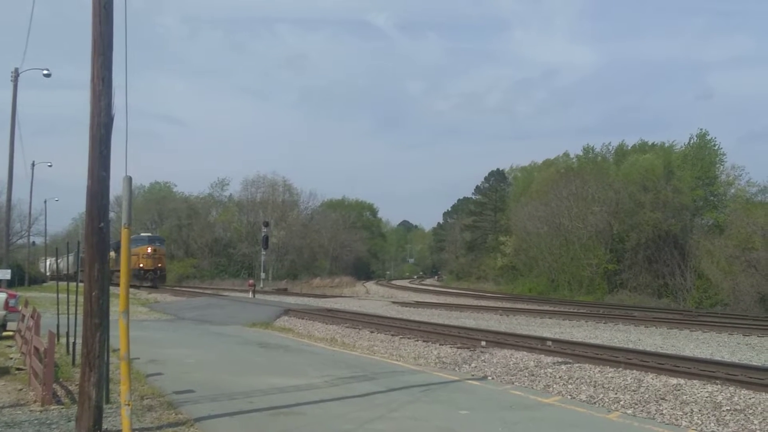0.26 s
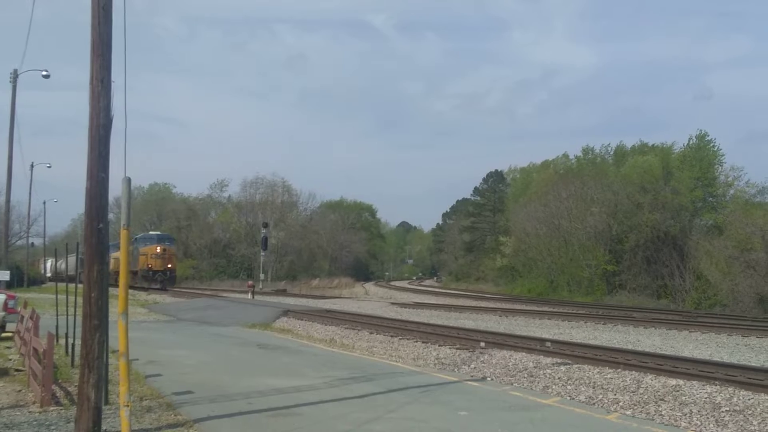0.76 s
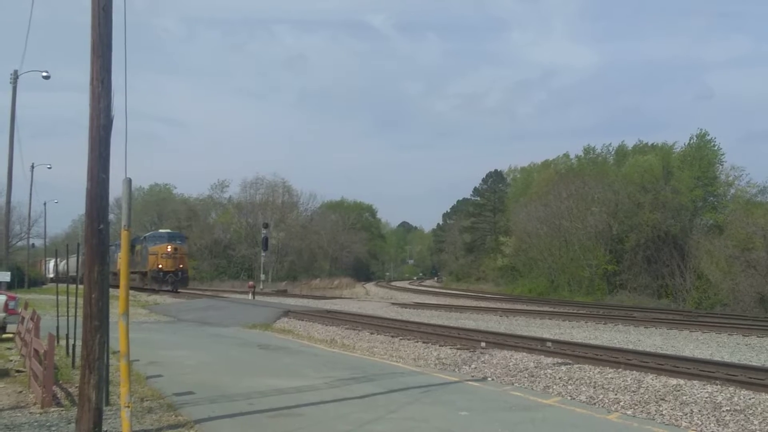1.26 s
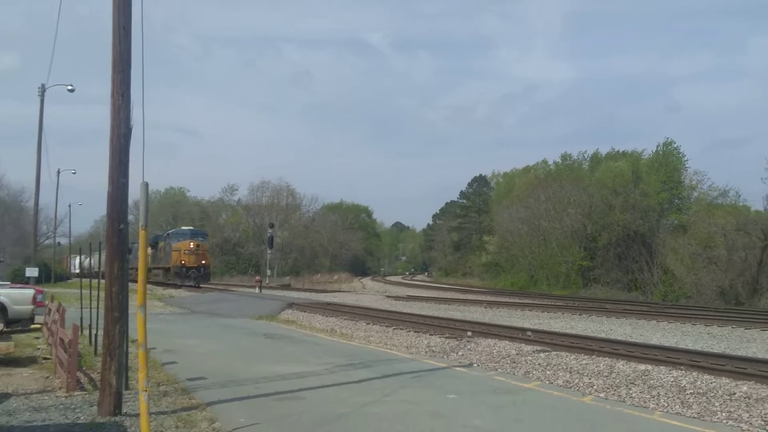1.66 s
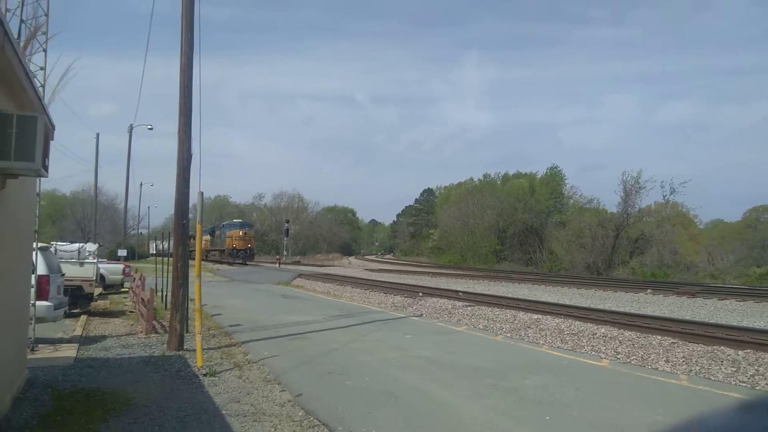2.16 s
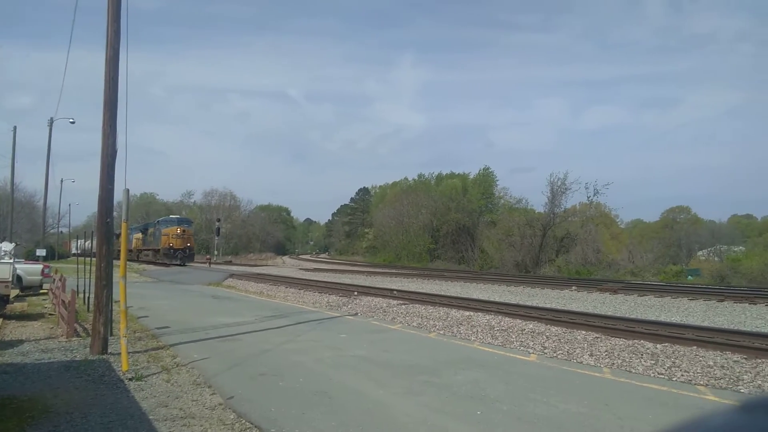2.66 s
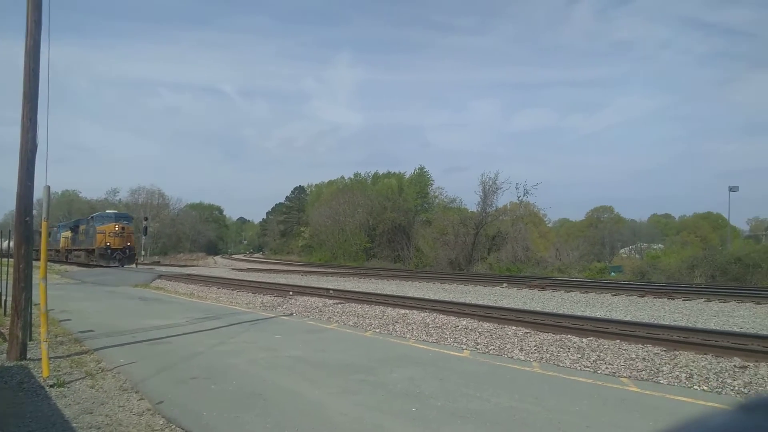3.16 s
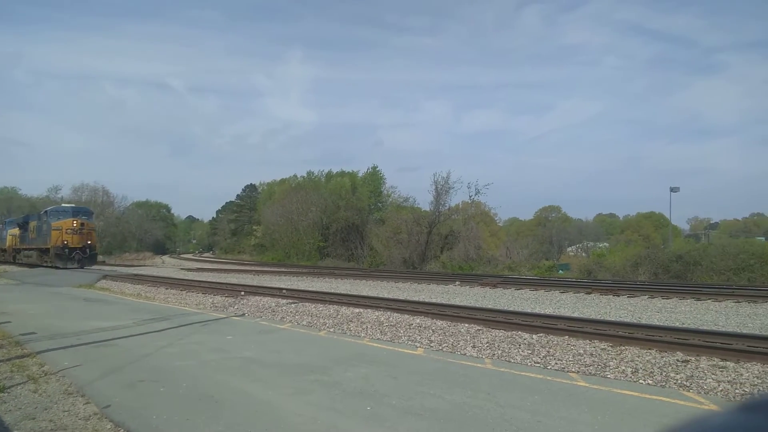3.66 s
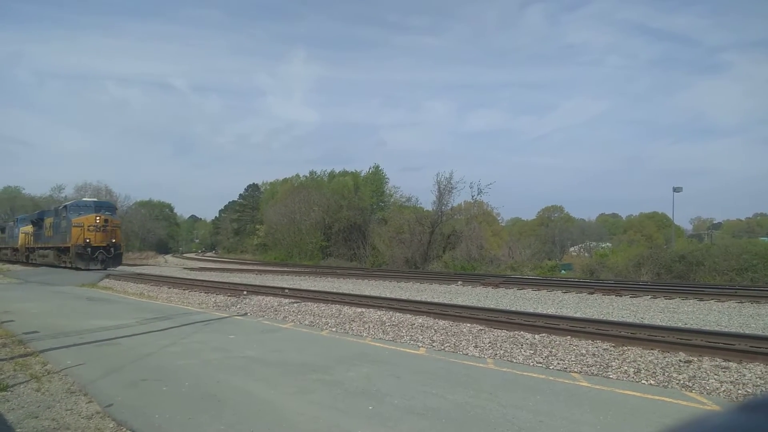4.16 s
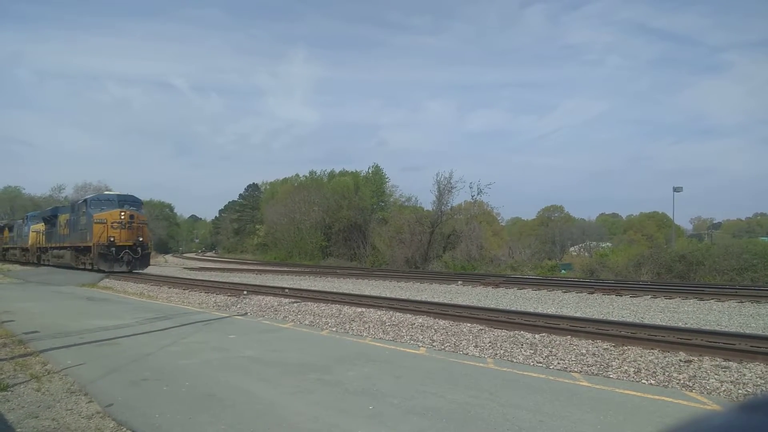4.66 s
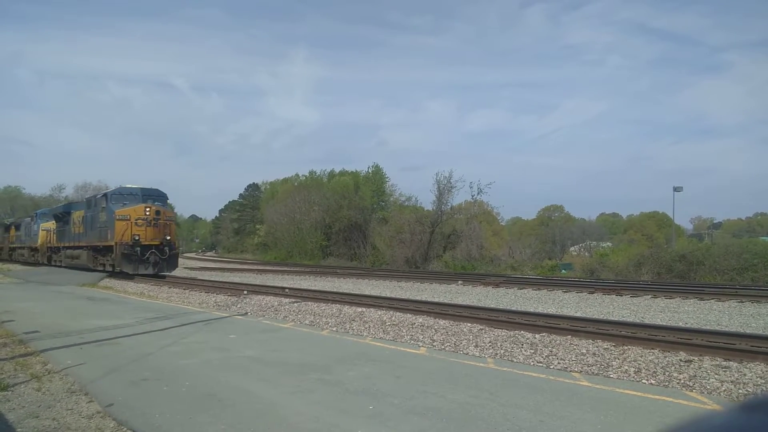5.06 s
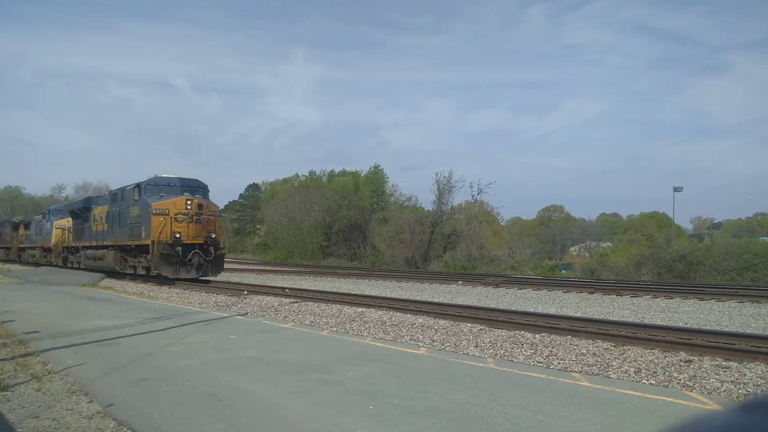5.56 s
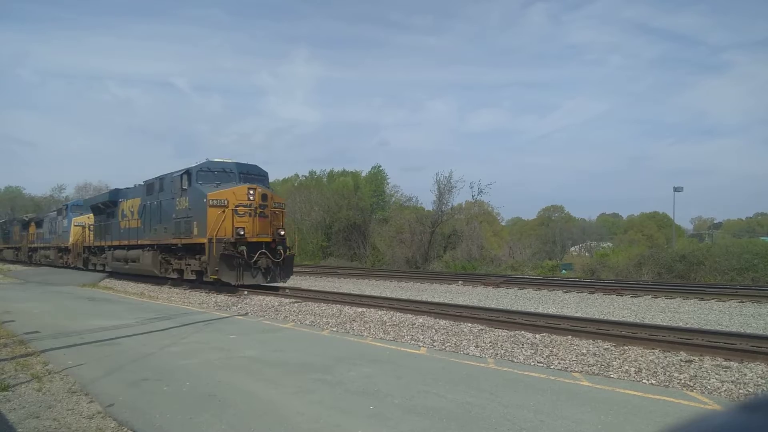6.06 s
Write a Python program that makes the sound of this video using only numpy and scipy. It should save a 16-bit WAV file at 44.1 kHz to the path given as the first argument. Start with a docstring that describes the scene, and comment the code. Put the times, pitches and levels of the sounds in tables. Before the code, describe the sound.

A diesel freight train approaches with a rumbling, humming engine and rolling wheels in light wind, its horn starting at the very end.

```python
"""A diesel freight train draws near over open ground and starts to blow its four-bell horn.
Cylinder firings make the exhaust rumble, two engines beat in a hum, fans rush and gears whine.
Wheels roar on the rails and clack over a switch, air valves spit, and faint chirps sound.
A light breeze buffets a phone's two microphone ports; its knocks and the horn push down the limiter."""
import sys
import numpy as np
from scipy import signal
from scipy.fft import rfft, irfft
from scipy.io import wavfile
from scipy.ndimage import uniform_filter1d, minimum_filter1d

SR = 44100
rng = np.random.default_rng(int(sys.argv[2]) if len(sys.argv) > 2 else 0)


def transcribe(u):
    """Save the signal u as a 16-bit wav file named by the first command-line argument.

    u: samples, shape (n,) or (channels, n), limited to [-1, 1]; the rate is SR.
    q: integer samples, one column per channel.
    """
    v = np.clip(np.atleast_2d(u).T, -1, 1)
    q = np.round(v * 32767).astype(np.int16)
    wavfile.write(sys.argv[1], SR, q)


N = 278712
T = np.arange(N) / SR
FREQ = np.maximum(np.arange(N // 2 + 1) * SR / N, 1)
CROSSING_SAMPLES = 2  # travel time of a wave from port to port


def undb(db):
    """Amplitude ratio of a level in decibels."""
    return 10 ** (np.asarray(db) / 20)


def unit(x):
    """Normalisation to rms 1."""
    return x / np.sqrt(np.mean(x ** 2))


def curves(table):
    """Linear interpolation of each column of a time table, one value per sample."""
    times, *columns = np.transpose(table)
    return [np.interp(T, times, column) for column in columns]


def bump(s, length_s):
    """Gaussian envelope of height 1, centred on time s."""
    return np.exp(-(2 * (T - s) / length_s) ** 2)


def pan(db):
    """Level difference, left minus right, as a pair of gains."""
    return undb(np.array([[db], [-db]]) / 2)


def colour(x, spectrum):
    """Spectral shaping by (f/Hz, level/dB) points with a roll-off beyond both ends, at rms 1."""
    hz, db = np.transpose(spectrum)
    roll_off = np.minimum(1, np.minimum(FREQ / hz[0], hz[-1] / FREQ)) ** 3
    gain = undb(np.interp(np.log(FREQ), np.log(hz), db))
    return unit(irfft(rfft(x) * roll_off * gain, N))


def resonate(x, hz, half_width_hz):
    """Resonance with steep skirts, 14 dB down at half_width_hz off centre, at rms 1."""
    return unit(irfft(rfft(x) / (1 + ((FREQ - hz) / half_width_hz) ** 2) ** 2.4, N))


def walk(rate_hz):
    """Random fluctuation: low-pass noise at rms 1."""
    return unit(irfft(rfft(rng.standard_normal(N)) * np.exp(-(FREQ / rate_hz) ** 2), N))


def air(own_db):
    """Partial coherence: one noise wave crosses both ports, and each adds noise of its own."""
    wave = rng.standard_normal(N)
    return np.array([wave, np.roll(wave, CROSSING_SAMPLES)]) + undb(own_db) * rng.standard_normal((2, N))


# bird-like chirps: t/s, duration/s, level/dB, f/Hz, glide/(Hz/s)
CHIRP_NOTES = [(0.183, 0.038, -47.5, 3070, 0), (0.523, .03, -46, 3970, 2002), (.551, .018, -47, 2850, 3000),
               (0.575, 0.022, -48, 3050, -19000), (.765, .02, -51, 2920, -12000),
               (0.939, 0.045, -54, 3010, -1000)]

def chirps(waver=0.0173):
    """Frequency modulation: faint, thin whistles glide and waver."""
    out = 0
    for s, length_s, db, hz, glide_hz_s in CHIRP_NOTES:
        pitch = (hz + glide_hz_s * np.clip(T - s, -length_s, length_s)) * (1 + waver * walk(250))
        out = out + undb(db) * bump(s, length_s) * np.sin(2 * np.pi * np.cumsum(pitch) / SR)
    return out


# gusts at the ports: t/s, duration/s, relative level/dB
WIND_GUSTS = [(0.09, .2, -33.5), (0.663, 0.14, -23), (1.42, 0.29, -19.5), (1.677, 0.3, -23),
              (2.067, 0.37, -18.5), (2.994, 0.18, -22.5), (3.302, 0.35, -29), (3.72, 0.53, -20),
              (3.98, 0.071, -26), (4.42, 0.14, -23), (4.7, 0.26, -27), (5.55, 0.14, -24.5)]
# spectrum of the breeze's rumble: f/Hz, relative level/dB
BREEZE_SPECTRUM = [(20, -38.5), (32, -32), (48, -7.5), (65, 8), (90, 0.5), (160, -11.5)]
# spectrum of the brighter eddies: f/Hz, relative level/dB
EDDY_SPECTRUM = [(50, -12.5), (80, -5), (120, 8.5), (180, -5.5), (260, -5.5), (400, -15), (900, -52)]

def wind(flicker_db=4.0, opposed=0.55, calm_rumble_db=-30.5, calm_eddy_db=-37.5):
    """Turbulence: rumble and eddies swell with each gust and push the ports in opposite senses."""
    gusts = sum(undb(db) * bump(s, length_s) for s, length_s, db in WIND_GUSTS)
    flow = np.array([rng.standard_normal(N) * undb(flicker_db * walk(21)) for _ in range(2)])
    flow = flow - opposed * flow[::-1]
    rumble = colour(flow, BREEZE_SPECTRUM) * np.hypot(undb(calm_rumble_db), gusts * undb(-13))
    eddies = colour(flow[::-1, ::-1], EDDY_SPECTRUM) * np.hypot(undb(calm_eddy_db), gusts * undb(-4.5))
    return rumble * pan(-4) + eddies * pan(1)


# knocks of wind on the ports: t/s, level/dB, f/Hz
WIND_KNOCKS = [(1.738, -9, 220), (1.7989, 2, 235), (2.086, -4.5, 204), (2.9633, -15, 230),
               (4.021, -3.5, 196), (4.498, -19, 210)]

def buffets(half_length_s=0.0018):
    """Pressure transients: a sharp eddy thumps for a cycle or two, out of phase between the ports."""
    port_phase = np.array([[0], [2.4]])
    out = np.zeros((2, N))
    for s, db, hz in WIND_KNOCKS:
        t = T - s
        out += undb(db) * np.exp(-(t / half_length_s) ** 2) * np.cos(2 * np.pi * hz * t + port_phase)
    return out * pan(5.1)


# blows of wheels on a switch: t/s, level/dB
SWITCH_BLOWS = [(2.958, -27), (2.989, -23.5), (3.022, -27), (4.490, -21.5), (4.524, -20.5), (4.564, -26)]
# modes rung by a blow: f/Hz, relative level/dB, decay time/s
SWITCH_MODES = [(620, -4, .004), (860, -2, .0035), (1240, -9, .003)]

def clacks():
    """Impact excitation: distant wheels strike a switch, whose damped modes ring for milliseconds."""
    blows = np.zeros(N)
    for s, db in SWITCH_BLOWS:
        blows[int(s * SR)] = undb(db)
    ring = sum(undb(db) * np.exp(-T / decay_s) * np.sin(2 * np.pi * hz * T)
               for hz, db, decay_s in SWITCH_MODES)
    return signal.fftconvolve(blows, ring)[:N]


# rolling noise as the cars round the bend: t/s, relative roar level/dB, relative hiss level/dB
ROLLING_LEVELS = [(0, -41, -52), (1.3, -41.5, -52.5), (2.1, -41.5, -50), (3.5, -42, -50), (4.3, -44.5, -53),
                  (5.1, -45, -53.5), (6.1, -41, -49.5)]
# spectrum of the wheels' roar: f/Hz, relative level/dB
ROAR_SPECTRUM = [(200, -17.5), (400, -13), (600, -3.5), (1050, -0.5), (1400, -8), (1800, -7), (2200, -6),
                 (2800, -13), (4500, -28)]
# spectrum of the rails' hiss: f/Hz, relative level/dB
HISS_SPECTRUM = [(1300, -19.5), (2200, 5), (2900, -16), (4000, 3.5), (4700, -5), (5500, -7), (6400, -13),
                 (7600, -9.5), (9500, -19.5), (12000, -32.5), (14500, -40.5)]

def wheels(swell_db, lean_db=5):
    """Rolling noise: wheels roar and rails hiss, brighter as less air lies between to absorb treble."""
    roar_db, hiss_db = curves(ROLLING_LEVELS)
    roar = colour(air(5), ROAR_SPECTRUM) * undb(roar_db + swell_db + 1.5 + 0.9 * walk(9.9)) * pan(1.5)
    brightness = undb(np.interp(T, [1.5, 6], [-22, -7]))
    sides = []
    for _ in range(2):
        body = colour(air(1), HISS_SPECTRUM)
        treble = resonate(air(0.94), 5600, 1400) + undb(-6) * resonate(air(0.9), 9000, 3500)
        sides.append((body + brightness * treble) * pan(lean_db))
    left, right = sides[0], sides[1][::-1]
    turn = np.pi / 2 * np.interp(T, [3.8, 4.4], [0, 1])  # the hiss drifts from left to right
    hiss = left * np.cos(turn) + right * np.sin(turn)
    return roar + hiss * undb(hiss_db + swell_db + walk(15))


# valve bursts: t/s, level/dB, f/Hz, half-width/Hz, rise time/s, decay onset/s, decay time/s
VALVE_BURSTS = [(1.2865, -44, 12500, 1500, .003, .003, 0.011), (1.284, -55, 11500, 4200, .01, .01, 0.05),
                (1.453, -45, 7100, 3600, .006, .004, 0.033), (5.976, -34.5, 6900, 6400, .006, .012, 0.012),
                (6.172, -36, 7000, 6000, .007, .005, 0.015), (6.175, -34.5, 6400, 6500, .007, .005, 0.43)]

def air_valves():
    """Jet noise: escaping air spits a band of hiss that rises quickly and decays exponentially."""
    out = np.zeros((2, N))
    for s, db, hz, half_width_hz, rise_s, hold_s, decay_s in VALVE_BURSTS:
        envelope = np.clip((T - s) / rise_s, 0, 1) * np.exp(-np.maximum(T - s - hold_s, 0) / decay_s)
        out += undb(db) * envelope * resonate(air(1.9), hz, half_width_hz)
    return out


# tones of turbocharger and gears: f/Hz, relative level/dB
WHINE_TONES = [(730.7, 0.5), (764, -5.5), (690, -12), (647, -8.5), (1074, -15), (2288, -14)]
# their common envelope: t/s, level/dB
WHINE_ENVELOPE = [(0, -47.5), (1.4, -47), (2.4, -60), (4, -51.5), (4.7, -44), (5.3, -44), (6.1, -40.5)]

def whines(waver=0.0012, flutter_db=1.2):
    """Tonal machine noise: thin whines flutter in the moving air and stand out at close range."""
    level_db, = curves(WHINE_ENVELOPE)
    out = 0
    for hz, db in WHINE_TONES:
        phase = 2 * np.pi * np.cumsum(hz * (1 + waver * walk(11.9))) / SR
        out = out + undb(db) * unit(np.sin(phase) * undb(flutter_db * walk(12)))
    return out * undb(level_db)


# spectrum of the cooling fans: f/Hz, relative level/dB
FAN_SPECTRUM = [(430, -31.5), (540, -10), (630, 15), (740, 9.5), (850, 8.5), (1050, -11.5)]

def fans():
    """Flow noise: the cooling fans give a steady band-limited rush."""
    return colour(air(-13), FAN_SPECTRUM) * pan(-1.5)


# envelope of the engines' hum: t/s, level/dB
HUM_ENVELOPE = [(0, -31.5), (.45, -35.5), (.85, -31), (1.05, -36.5), (1.7, -30), (2.15, -33.5),
                (2.33, -28.5), (2.8, -28.5), (3.45, -24.5), (3.8, -28.5), (4.03, -28), (4.22, -26),
                (4.6, -21.5), (4.85, -24), (5.3, -28.5), (5.7, -27), (6.3, -29)]
# beat minima: t/s, level of the second engine re the first/dB
BEAT_MINIMA = [(.25, -7), (.47, -10), (.72, -9.5), (1.02, -12), (1.32, -7.5), (1.53, -12.5), (1.86, -22),
               (2.2, -5.5), (2.45, -8), (2.72, -12.5), (2.9, -11), (3.12, -6), (3.34, -11.5), (3.69, -5.5),
               (3.93, 2), (4.1, -11), (4.31, -1), (4.475, -10.5), (4.88, -18), (5.23, -2), (5.5, -7),
               (5.76, -16.5), (6, -10.5), (6.14, -2)]
# tones either side of the hum: f/Hz, half-width/Hz, level re the hum/dB
HUM_SIDE_TONES = [(306.2, 3.3, -13), (363.5, 3, -19.5)]

def engine_hum(hum_hz=323.7, sag_hz_per_s=0.8, waver=0.0025, flutter_db=2.0, skirt_db=-20):
    """Beating: two engines of nearly equal, sinking pitch slip one cycle from each lull to the next."""
    hz = (hum_hz - sag_hz_per_s * T) * (1 + waver * walk(14.3))
    phase = 2 * np.pi * np.cumsum(hz) / SR + np.array([[0], [.55]])
    level_db, = curves(HUM_ENVELOPE)
    second_db, = curves(BEAT_MINIMA)
    lull_times = [s for s, _ in BEAT_MINIMA]
    slipped_cycles = np.r_[-.5, np.arange(len(lull_times)), len(lull_times) - .5]
    slip = 2 * np.pi * np.interp(T, [0, *lull_times, T[-1]], slipped_cycles)
    tone = unit(np.sin(phase) - undb(second_db) * np.sin(phase + slip)) * undb(flutter_db * walk(30))
    skirt = undb(skirt_db) * resonate(air(-11), hum_hz, 38.5)
    sides = sum(undb(db) * resonate(air(-3.5), side_hz, half_width_hz)
                for side_hz, half_width_hz, db in HUM_SIDE_TONES)
    lean_db = np.interp(T, [2.5, 5], [-2.1, -6.65])  # farther right as the train nears
    return unit(tone + skirt + sides) * pan(1) ** lean_db * undb(level_db)


# spectrum of the exhaust's rumble: f/Hz, relative level/dB
EXHAUST_SPECTRUM = [(45, -17.5), (60, -9.5), (85, -0.5), (120, -1.5), (150, -4), (190, 3), (235, -4),
                    (280, -3.5), (400, -15), (560, -17), (900, -30)]
# throbbing exhaust tones: f/Hz, half-width/Hz, level re the rumble/dB
EXHAUST_THROBS = [(119.4, 7, -11.5), (152.5, 4.5, -10)]

def exhaust(firing_hz=109.9, scatter_db=2, smear_s=0.022, pulse_db=-6):
    """Pulse train: twelve unequal cylinders fire in turn; distance smears them amid turbulent gas."""
    cycles = np.cumsum(firing_hz * (1 + 0.00449 * walk(3.44))) / SR
    firings = np.flatnonzero(np.diff(np.floor(cycles)))
    strengths = np.resize(rng.standard_normal(size=12), len(firings)) + 0.63
    pulses = np.zeros(N)
    pulses[firings] = strengths * undb(scatter_db * rng.standard_normal(len(firings)))
    smeared = signal.fftconvolve(pulses, rng.standard_normal(N) * np.exp(-T / smear_s))[:N]
    throb = sum(undb(db) * resonate(air(-8), hz, half_width_hz)
                for hz, half_width_hz, db in EXHAUST_THROBS)
    rumble = colour(undb(pulse_db) * unit(smeared) + air(-7.5), EXHAUST_SPECTRUM)
    return unit(rumble + throb) * pan(-4)


# fundamentals of the horn bells at full pressure, lowest first: f/Hz
BELL_FUNDAMENTALS = [270.1, 333.3, 405.0, 541.5]
# response of each bell: rise time/s, overshoot/1, initial sharpness/1,
# share of the pressure swell/1, relative level of the brassy top/dB
BELL_RESPONSES = [(0.005, 0.71, 0.0047, .3, -42.5), (0.012, 0.1, 0.0051, 0.52, -50),
                  (0.005, 0.23, 0.0027, 0.47, -44), (0.005, 0.79, 0.0089, 0.4, -61)]
# harmonics of each bell, fundamental first: relative level/dB, left minus right/dB
BELL_HARMONICS = [
    [(-32, -5), (-30.5, 1), (-39.5, -7), (-47, -4), (-31.5, 8)],
    [(-27, 5.5), (-6.5, -1), (-28, 4), (-49, -1), (-39, 2)],
    [(-18.5, -9), (-25, 7), (-32.5, 4.5), (-32.5, 12.5), (-62, -5), (-33.5, 3.5)],
    [(-17.5, -6), (-26.5, -4)],
]

def horn(start_s=6.099, full_s=6.238, attack_s=0.007, build_db_per_s=72, ease_db_per_s=73,
         settle_s=0.06, sag_per_s=0.062, waver=0.0018, steepen=0.29, gain_db=1.5):
    """Nonlinear steepening: four diaphragm bells start with a squawk and turn brassy under pressure."""
    age = np.maximum(T - start_s, 0)
    past_full = np.maximum(T, start_s) - full_s
    pressure_db = np.minimum(build_db_per_s * past_full, -ease_db_per_s * past_full)
    sag = 1 - sag_per_s * past_full  # the pitch falls as the train closes in
    surge = bump(start_s + 0.014, 0.04)
    chord = 0
    for hz, response, harmonics in zip(BELL_FUNDAMENTALS, BELL_RESPONSES, BELL_HARMONICS):
        rise_s, overshoot, sharp, follow, brass_db = response
        pitch = hz * sag * (1 + sharp * np.exp(-age / settle_s) + waver * walk(50))
        phase = 2 * np.pi * np.cumsum(pitch) / SR
        phase -= phase[int((start_s + attack_s) * SR)]  # the bells start in step
        phase = np.array([np.roll(phase, CROSSING_SAMPLES), phase])
        flutter = undb(0.8 * walk(25))
        envelope = np.sqrt(2) * (1 - np.exp(-age / rise_s)) * (1 + overshoot * surge) * flutter
        for k, (db, pan_db) in enumerate(harmonics, 1):
            # the higher the partial, the more it depends on the pressure
            swell_db = pressure_db * (follow + steepen * (k - 1))
            chord = chord + envelope * undb(db + swell_db) * pan(pan_db) * np.cos(k * phase)
        # brassy top: rough harmonics near 2600-3600 Hz, each 1 dB below the last
        first, last = int(2600 / hz) + 1, int(3600 / hz)
        brass = undb(brass_db + 2.3 * pressure_db + 3.5 * walk(124))
        for k in range(first, last + 1):
            chord = chord + brass * undb(first - k) * np.cos(k * phase)
    rasp_spectrum = [(300, -17), (560, -5), (800, 2), (1250, -1.5), (1800, -18), (3000, -32), (4500, -30)]
    rasp = undb(pressure_db - 29) * colour(air(7.9), rasp_spectrum)
    squawk = undb(-23) * resonate(air(-11), 580, 55) * np.exp(-age / 0.077) * pan(-11)
    return (chord + rasp + squawk) * undb(gain_db) * np.minimum(age / attack_s, 1)


# swells of exhaust, fans and wheels in the moving air: t/s, duration/s, gain/dB
AIR_SWELLS = [(0.705, 0.5, 2), (1.304, 0.22, 2), (3.146, 0.18, 2), (4.687, 0.47, 2), (5.648, 0.21, 2.5)]

def scene(speed_m_s=16.3, abreast_s=7.22, track_distance_m=23.3):
    """Superposition: all sources add, and exhaust and fans grow as the locomotive nears."""
    nearness = track_distance_m ** 2 / (track_distance_m ** 2 + (speed_m_s * (T - abreast_s)) ** 2)
    closing = (nearness - nearness[0]) / (1 - nearness[0])  # 0 at the start, 1 when abreast
    swell_db = sum(db * bump(s, length_s) for s, length_s, db in AIR_SWELLS)
    exhaust_db = -28 + 3.5 * closing + swell_db
    fan_db = -45.5 + 15.5 * closing + swell_db
    locomotive = exhaust() * undb(exhaust_db) + engine_hum() + fans() * undb(fan_db) + whines()
    train = locomotive + wheels(swell_db) + clacks() + air_valves()
    return train + chirps() + horn() + wind() + buffets()


def limiter(x, limit_db=-3, release_db_per_s=9):
    """Peak limiting: the gain drops quickly for a peak over the limit and creeps back."""
    peak_db = 20 * np.log10(np.abs(x).max(axis=0) + 1e-9)
    over_db = np.maximum(peak_db - limit_db, 0)
    held_db = np.maximum.accumulate(over_db + release_db_per_s * T) - release_db_per_s * T
    return x * uniform_filter1d(minimum_filter1d(undb(-held_db), size=129), size=129)


def record(dry, widen_hz=1080, lag_s=21 / SR, top_hz=14280):
    """Crosstalk cancellation widens the treble; the phone then limits peaks and cuts the top."""
    fade_out = np.minimum(1, (T[-1] - T) / .003)
    ports = rfft(dry * fade_out)
    share = .85 / (1 + (widen_hz / FREQ) ** 6) / (1 + (FREQ / 9000) ** 2)
    delayed_opposite = np.exp(-2j * np.pi * FREQ * lag_s) * ports[::-1]
    wide = (ports - share * delayed_opposite) / np.sqrt(1 + share ** 2)
    limited = limiter(irfft(wide, N))
    return signal.sosfilt(signal.ellip(10, .2, 80, top_hz, fs=SR, output="sos"), limited)


dry = scene()
out = record(dry)
transcribe(out)
```